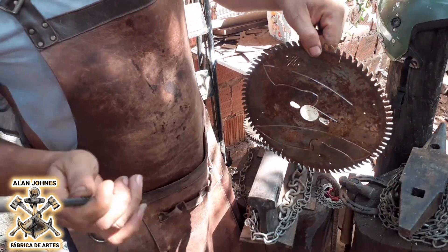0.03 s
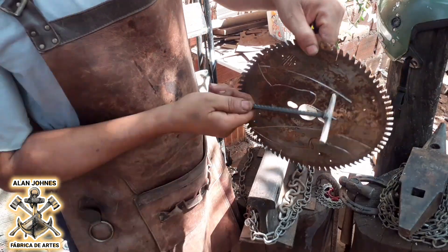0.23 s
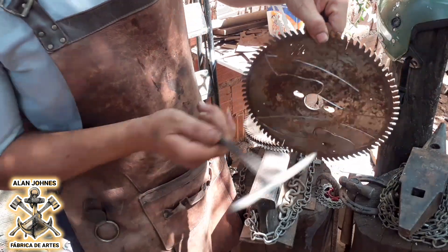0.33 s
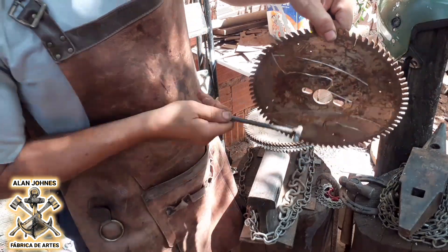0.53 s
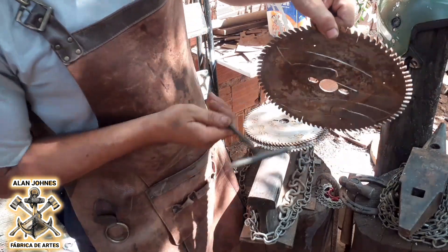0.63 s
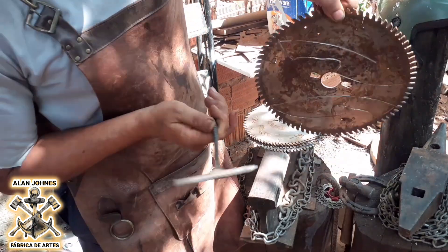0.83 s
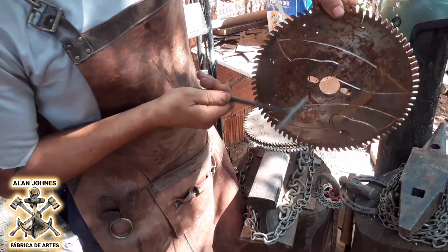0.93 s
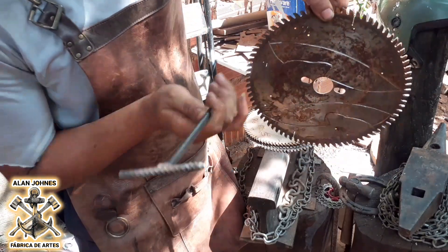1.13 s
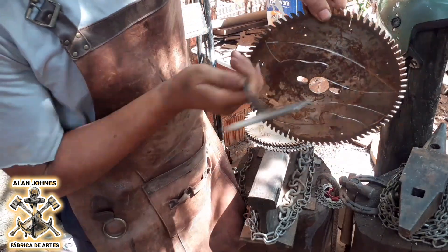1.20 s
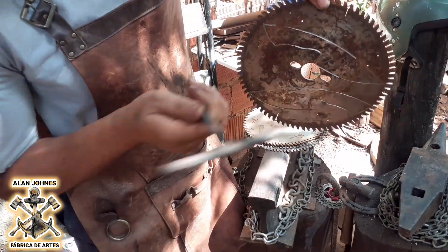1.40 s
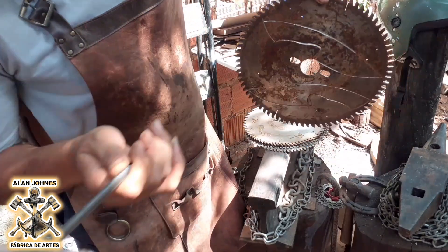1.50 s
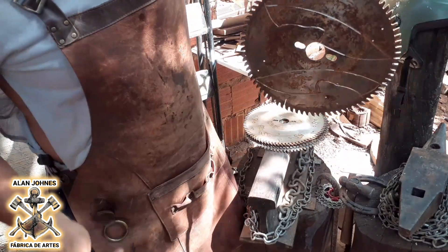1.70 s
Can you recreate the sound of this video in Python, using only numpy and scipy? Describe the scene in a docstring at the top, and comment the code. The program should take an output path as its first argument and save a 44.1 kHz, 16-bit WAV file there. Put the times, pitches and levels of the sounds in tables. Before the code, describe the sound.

A circular saw blade is already ringing, close up in a quiet workshop. A small hammer strikes it at about 0.25, 0.55, 0.7, 0.95 and 1.25 seconds. Each hit is a bright clack with a short dull thud, heaviest on the first. The clear, bell-like ring swells back after each, its high shimmer fading quickly. The blade rings on to the end, as a faint low hum rises around 1.5 seconds.

```python
"""Hammer on a rusty saw blade

In a workshop, close to a stereo pair of microphones, a circular saw blade is held by its rim and struck
five times with a small hammer. Still ringing from an earlier blow, it clacks and thuds at each hit, and
its long modes are fed according to where the hammer lands between hub and rim. The recorder's limiter
ducks at each hit, so the ring swells back after it. Quiet air and a low hum lie behind."""
import sys
import numpy as np
from scipy import signal
from scipy.fft import rfft, irfft
from scipy.io import wavfile
from scipy.ndimage import map_coordinates

SR = 44100
rng = np.random.default_rng(int(sys.argv[2]) if len(sys.argv) > 2 else 0)


def transcribe(u):
    """Save the signal u as a 16-bit wav file named by the first command-line argument.

    u: samples, shape (n,) or (channels, n), limited to [-1, 1]; the rate is SR.
    q: integer samples, one column per channel.
    """
    v = np.clip(np.atleast_2d(u).T, -1, 1)
    q = np.round(v * 32767).astype(np.int16)
    wavfile.write(sys.argv[1], SR, q)


N = 77175
TIME = np.arange(N) / SR
DIFFUSE_HZ = 4880  # stereo spread, flicker, sway and raggedness grow with pitch up to here


def amp(db):
    """Decibels to gain."""
    return 10 ** (np.asarray(db) / 20)


def at_pitch(points, hz):
    """A table's value at hz, on a log-frequency axis."""
    pitches, values = np.transpose(points)
    return np.interp(np.log(hz + 1), np.log(pitches + 1), values)


def tone(hz, phases):
    """A steady sine, one row for each starting phase [rad]."""
    return np.sin(2 * np.pi * hz * TIME + np.asarray(phases)[:, None])


def wander(points, rate_hz):
    """A smooth curve through evenly spaced values, rate_hz of them a second."""
    coarse = np.arange(0, N + 128, 128)
    curve = map_coordinates(points, [coarse / SR * rate_hz], order=3, mode="mirror")
    return np.interp(np.arange(N), coarse, curve)


def noise(db_of_hz, alike):
    """Coloured noise of unit level; alike is the correlation between the two microphones."""
    colour = amp(db_of_hz(np.fft.rfftfreq(N, 1 / SR)))
    left, other = irfft(rfft(rng.standard_normal((2, N))) * colour, N)
    pair = np.array([left, alike * left + np.sqrt(1 - alike ** 2) * other])
    return pair / pair.std()


# Hammer blows; the first falls before the start (time [s], ring level [dB], place [0 hub, 1 rim],
# energy surviving the contact [share], shimmer level [dB], contact [s], clack level [dB], thud level [dB])
BLOWS = [(-1.035, 1.5, 0.718, 1, -16, .01, -34, -33), (.243, 2.1, 0.055, .9, -0.5, 0.024, 0, 6),
         (.5378, -1, 0.98, 0.23, 0, 0.019, -0.5, 0), (.7038, -4.5, 0.7024, 0.6, -3, 0.011, 0.5, -1.5),
         (.9642, -0.5, .928, 0.39, -3.5, 0.016, -4.5, -3.5), (1.263, -1.5, 0.33, 0.54, -1, 0.013, 3, 2)]
BLOW_S, RING_DB, PLACE, SURVIVES, SHIMMER_DB, CONTACT_S, CLACK_DB, THUD_DB = np.transpose(BLOWS)


def ring(gains, t60, bloom_s=0):
    """Envelope of a mode: each blow damps the stored energy and adds its own, building over bloom_s."""
    envelope, energy = np.zeros(N), 0
    ends = [*BLOW_S[1:], N / SR]
    for start, end, survives, gain in zip(BLOW_S, ends, SURVIVES, gains):
        energy *= survives
        span = np.arange(max(round(start * SR), 0), round(end * SR))
        age = span / SR - start
        fresh = gain * (1 - np.exp(-age / bloom_s)) if bloom_s > 0 else gain
        envelope[span] = np.sqrt(energy + fresh ** 2) * amp(-60 * age / t60)
        energy = (energy + gain ** 2) * amp(-60 * (end - start) / t60) ** 2
    return envelope


# The blade's clear modes (pitch [Hz], level [dB], t60 [s], shape from hub to rim [half waves],
# offset of that shape [half waves], left minus right microphone [dB])
BLADE_MODES = [(570.5, -22, 3.24, 1.77, 0.827, 2.5), (818, -26, 0.48, 3.39, 0.3, -2),
               (1070.4, -4.5, 2.14, 4.13, 0.24, 0), (1407.0, -33.5, 1.1, 4.53, 0.29, -4.5),
               (1488.7, -12.0, 1.007, 4.8, 0.081, 2.5), (1648.0, -18, 0.53, 0.98, 0.38, 2.5),
               (1875, -15.5, 0.41, 4.28, 0.37, -0.5), (2202, -39, 2.84, 1.1, 0.35, 4.5),
               (2256, -20, 0.58, 0.92, 0.61, 4), (2434.0, -12, 0.29, 4.26, 0.45, -4),
               (2510, -18, 0.82, 0.83, 0.72, 1.0), (2562.4, -6, 0.4, 1.277, 0.3, 3),
               (2671, -21.5, 1.02, 1.65, 0.93, 6.5), (2960, -36, 2.6, 4.69, 0.14, 4),
               (3007.0, -22.5, 0.44, 3.55, 0.23, -1), (3073, -17, 0.55, 5.05, 0.8, -5),
               (3253.0, -27.5, 1.06, 4.33, 0.79, 7), (3277.0, -18.5, 1.79, 3.204, 0.45, -0.5),
               (3343, -11.5, 1.53, 3.216, 0.28, -1.0), (3385, -21, 0.45, 1.2, 0.56, 6),
               (3456, -20, 0.58, 4.36, 0.39, -3), (3600, -19.7, 0.36, 1.04, 0.62, -5),
               (3640, -17.5, 0.37, 5.6, 0.41, -5), (4083, -20.5, 0.75, 1.19, 0.61, 1),
               (4296, -19, 1.53, 2.15, 0.58, 2), (4482.0, -14, 0.48, 5.07, 0.94, 1),
               (4620, -23, 0.85, 0.31, 0.25, 5), (4966, -18, 0.55, 2.4, 0.15, 0.5),
               (5060, -22, 0.36, 3.9, 0.42, -1.5), (5100, -36.7, 1.49, 1.01, 0.31, -1.0),
               (5410, -12, 0.3, 4.51, 0.2, 8.5), (5416.0, -10.4, 0.53, 3.197, 0.42, 3.5),
               (5505, -8, 0.28, 6.02, 0.23, 1.0), (5600, -34.5, 1.85, 4.57, 0.27, 1),
               (5970, -10.5, 0.29, 4.39, 0.32, -1), (6088.0, -8.5, 0.29, 1.46, 0.48, 2.5),
               (6474, -6, 0.24, 3.84, 0.7, -0.5), (6700, -16.5, 0.44, 4.56, 0.25, 3),
               (6860, -13.4, 0.27, 2.33, 0.16, -7), (6940, -13, 0.35, 2.08, 0.59, -1),
               (7070, -11, 0.27, 4.7, 0.23, 0.0), (7300, -13.5, 0.29, 3.59, 0.27, -3),
               (7548.0, -15.6, 0.17, 2.05, 0.66, 6), (7770, -17, 0.56, 4.73, 0.098, 1.5),
               (8200, -4, 0.2, 0.72, 0.33, 2.5), (8270, -12.5, 0.29, 4.02, 0.29, 1.5),
               (8500, -4.5, 0.19, 3.16, 0.23, -3), (9100, -26.5, 0.62, 2.49, 0.4, 5),
               (9140, -12, 0.21, 3.51, 0.35, 6), (9300, -15.5, 0.2, 1.2, 0.87, 7),
               (9400, -22, 0.38, 4.15, 0.4, 5), (9570, -39, 1.1, 3.53, 1.0, 5.5),
               (11170, -37.5, 1.2, 4.51, 0.27, 10), (12596.0, -5, 0.16, 1.24, 0.41, 5.0),
               (13500, -18, 0.3, 4.51, 0.42, 3.5), (13849.0, -13.5, 0.24, 4.75, 0.15, 1.5),
               (14757.0, 0, 0.18, 1.09, 0.44, 4), (14897.0, -24, 0.21, 4.16, 0.51, 1)]


def blade_ring():
    """Clear modes, each fed by the height of its shape under the hammer, with drifting reflections."""
    node_leak = 0.0046  # share of energy a mode takes even when hit on a node
    spread_rad = 1.57  # phase between the microphones in the treble
    echo_db, flicker_hz = -6, 29.95  # reflections flicker as the blade moves in the hand
    sway_db, sway_hz = 2.4, 7.2  # treble modes swell and sink as it turns
    beat_hz, beat_depth, beat_peak_s = 3.24, 0.2, 0.011
    out = np.zeros((2, N))
    chances = rng.random((len(BLADE_MODES), 2))
    drifts = rng.standard_normal((len(BLADE_MODES), 5, 40))
    for (hz, db, t60, waves, offset, pan_db), (side, phase), drift in zip(BLADE_MODES, chances, drifts):
        diffuse = min(hz / DIFFUSE_HZ, 1)
        apart = spread_rad * diffuse * np.sign(side - 0.5)
        direct = tone(hz, 2 * np.pi * phase + np.array([0, apart]))
        sine, cosine = tone(hz, [0, np.pi / 2])
        echo = np.array([wander(a, flicker_hz) * sine + wander(b, flicker_hz) * cosine
                         for a, b in (drift[:2], drift[2:4])])
        shape = np.sqrt(np.cos(np.pi * (waves * PLACE + offset)) ** 2 + node_leak)
        envelope = ring(amp(db + RING_DB) * shape, t60, bloom_s=0.0074)  # builds as reflections arrive
        envelope *= amp(sway_db * diffuse * wander(drift[4], sway_hz))
        if hz == BLADE_MODES[0][0]:  # the lowest mode is a close pair and throbs slowly
            envelope *= 1 + beat_depth * np.cos(2 * np.pi * beat_hz * (TIME - beat_peak_s))
        pan = amp([[pan_db / 2], [-pan_db / 2]])
        out += pan * envelope * (direct + amp(echo_db) * diffuse * echo)
    return out


# Low bending modes of the whole blade (pitch [Hz], level [dB], t60 [s])
FLEX_MODES = [(193.5, -39, 1.39), (370, -57, 5.7)]


def blade_flex():
    """The blade bends faintly, fed by the thud of each blow, with the same swell in both microphones but a
    different phase in each."""
    force = amp(THUD_DB / 2)
    return sum(ring(amp(db) * force, t60) * tone(hz, 2 * np.pi * rng.random(2))
               for hz, db, t60 in FLEX_MODES)


# Course of the workshop's hum (time [s], level [dB])
HUM_LEVELS = [(0.2, -86), (.35, -59), (.6, -57), (.88, -67), (1.15, -48.5), (1.4, -58), (1.55, -40),
              (1.75, -44.5)]
# Colour of the workshop's air (frequency [Hz], relative level [dB])
AIR_COLOUR = [(25, -26), (100, -10.5), (400, -11.5), (1500, -26), (6000, -34), (15000, -45)]


def room_tone(hum_hz=101.4, hum_width_hz=14, air_db=-64.5):
    """Quiet workshop air behind the blade, and a low hum that grows towards the end."""
    hum = noise(lambda hz: -20 * np.log10(1 + ((hz - hum_hz) / hum_width_hz * 2) ** 2), alike=0.88)
    air = noise(lambda hz: at_pitch(AIR_COLOUR, hz), alike=0.61)
    hum_db = np.interp(TIME, *np.transpose(HUM_LEVELS))
    return amp(hum_db) * hum + amp(air_db) * air


def contact(colour, levels_db, hold_share, t60, alike, room_db):
    """Each hammer contact is a noise burst: a short hold, a quick fade and the workshop's faint tail."""
    rise_s, room_t60, ragged_db = 0.0011, 0.91, 5.5
    grid_hz = np.linspace(0, SR / 2, 170)
    out = np.zeros((2, N))
    peaks_by_blow = rng.standard_normal((len(BLOWS), len(grid_hz)))  # each blow has its own ragged colour
    for start, contact_s, db, peaks in zip(BLOW_S, CONTACT_S, levels_db, peaks_by_blow):
        age = np.maximum(TIME - start, 0)
        rise = np.minimum(age / rise_s, 1)
        burst = amp(-60 * np.maximum(age - hold_share * contact_s, 0) / t60)
        tail = amp(room_db - 60 * age / room_t60)
        ripple_db = ragged_db * np.minimum(grid_hz / DIFFUSE_HZ, 1) * np.clip(peaks, -2, 2)
        clash = noise(lambda hz: at_pitch(colour, hz) + np.interp(hz, grid_hz, ripple_db), alike)
        out += amp(db) * rise * (burst + tail) * clash
    return out


# Colour of the clack (frequency [Hz], relative level [dB])
CLACK_COLOUR = [(100, -32), (400, -10), (800, 0.5), (1500, -5), (3000, -4.5), (6000, -9), (9000, -8.5),
                (11000, -18.5), (15000, -8)]


def clack():
    """The bright clash of hammer on steel, wide across the microphones."""
    return contact(CLACK_COLOUR, CLACK_DB + 0.5, hold_share=0.76, t60=0.11, alike=0.11, room_db=-40.5)


# Colour of the thud (frequency [Hz], relative level [dB])
THUD_COLOUR = [(25, -42), (70, -8.5), (120, -7), (200, -16), (320, 2), (450, -3.5), (800, -12.5),
               (1600, -12), (5000, -45)]


def thud():
    """The low, short body of each hammer contact."""
    return contact(THUD_COLOUR, THUD_DB - 6, hold_share=0.99, t60=0.066, alike=0.12, room_db=-49)


# Dull modes under the thud (pitch [Hz], level [dB], t60 [s])
KNOCK_MODES = [(318.8, -9, 0.11), (368.1, -12.5, 0.086)]


def knock():
    """Quickly damped modes give each thud a dull pitch."""
    return sum(ring(amp(db + THUD_DB), t60) * tone(hz, 2 * np.pi * rng.random(2))
               for hz, db, t60 in KNOCK_MODES)


# Strength of the blade's weak modes (pitch [Hz], level of each [dB])
SHIMMER_LEVELS = [(1500, -37.5), (3000, -36), (5000, -28), (6500, -28.5), (8500, -28.5), (10500, -29.5),
                  (15500, -29.5)]
# Their decay (pitch [Hz], t60 [s])
SHIMMER_DECAYS = [(1500, 0.69), (5000, 0.38), (9000, 0.33), (15500, 0.25)]


def shimmer(count=110, scatter_db=6, t60_scatter=0.19):
    """A crowd of weak, short modes, excited differently by every blow."""
    out = np.zeros((2, N))
    low_hz, high_hz = SHIMMER_LEVELS[0][0], SHIMMER_LEVELS[-1][0]
    pitches = low_hz + (high_hz - low_hz) * (np.arange(count) + rng.random(count)) / count
    phases = 2 * np.pi * rng.random((count, 2))
    scatters = rng.uniform(-0.97, 1, (count, len(BLOWS) + 1))
    for hz, phase_pair, scatter in zip(pitches, phases, scatters):
        gains = amp(at_pitch(SHIMMER_LEVELS, hz) + SHIMMER_DB + scatter_db * scatter[1:])
        t60 = at_pitch(SHIMMER_DECAYS, hz) * np.exp(t60_scatter * scatter[0])
        out += ring(gains, t60) * tone(hz, phase_pair)
    return out


def scene():
    """At the microphones: the ringing blade and the hammer up close, the workshop behind."""
    contacts = clack() + thud()
    modes = blade_ring() + blade_flex() + knock()
    lean_left = amp([[0.4], [-0.4]])
    return modes + lean_left * (contacts + shimmer()) + room_tone()


def record(dry):
    """The recorder: a fast limiter that lets the first spike through, soft clipping, a band limit."""
    limit_db, sense_s, attack_s, release_s = -7, 0.0028, 0.0003, 0.027
    ceiling, edge_hz = 0.9, 15550
    sense, attack = np.exp(-1 / (SR * np.array([sense_s, attack_s])))
    power = signal.lfilter([1 - sense], [1, -sense], (dry ** 2).mean(0))
    over_db = np.maximum(10 * np.log10(power + 1e-12) - limit_db, 1e-6)
    fall = TIME / release_s
    cut_db = np.exp(np.maximum.accumulate(np.log(over_db) + fall) - fall)  # jumps at a peak, then recovers
    limited = dry * amp(-signal.lfilter([1 - attack], [1, -attack], cut_db))
    clipped = limited / (1 + (limited / ceiling) ** 8) ** (1 / 8)
    lowpass = signal.firwin(511, edge_hz, window=("kaiser", 7), fs=SR)
    return signal.oaconvolve(clipped, lowpass[None], "same")


dry = scene()
out = record(dry)
transcribe(out)
```